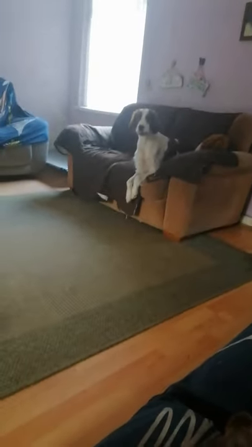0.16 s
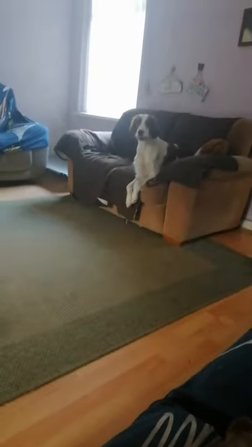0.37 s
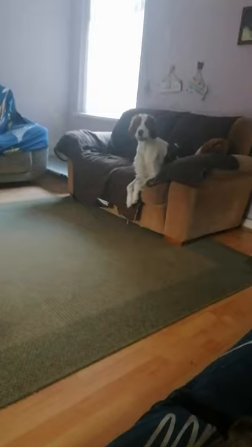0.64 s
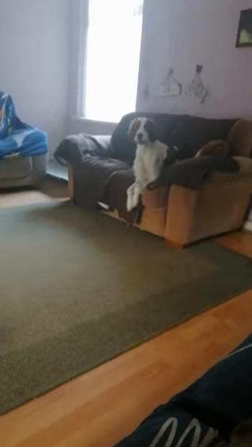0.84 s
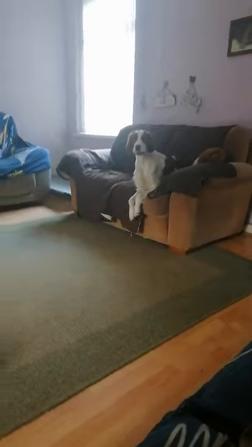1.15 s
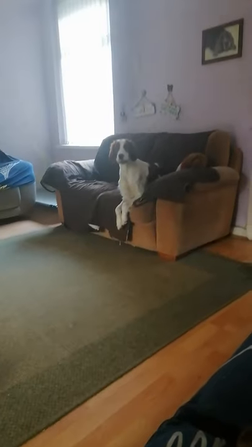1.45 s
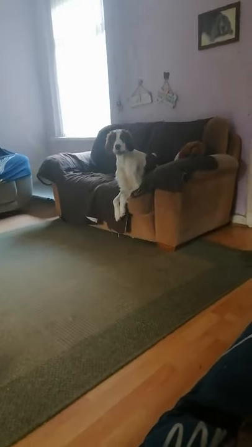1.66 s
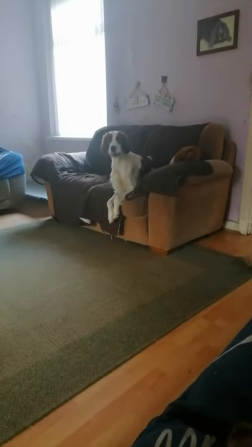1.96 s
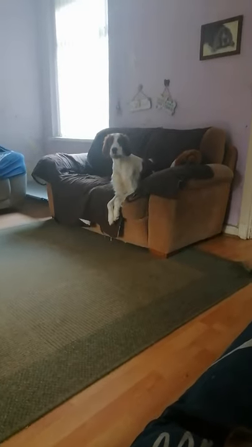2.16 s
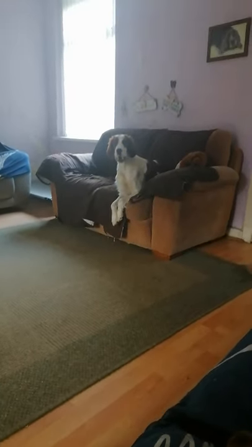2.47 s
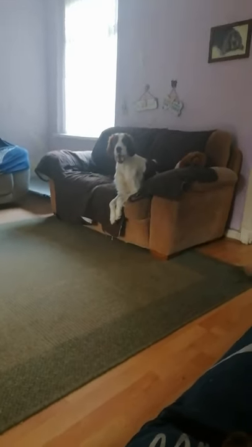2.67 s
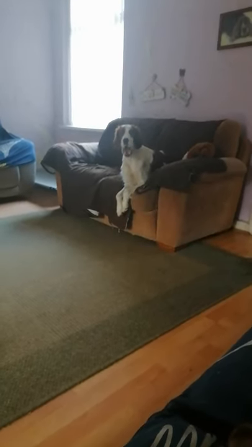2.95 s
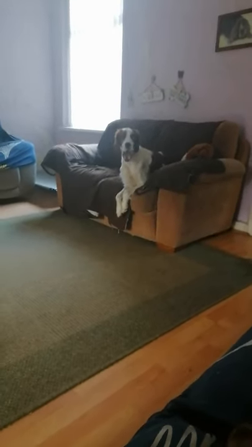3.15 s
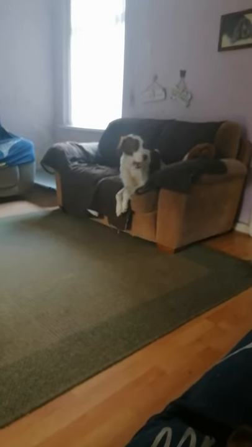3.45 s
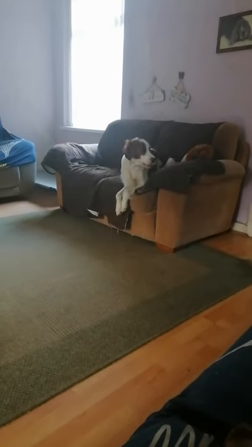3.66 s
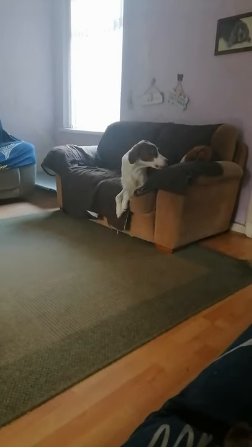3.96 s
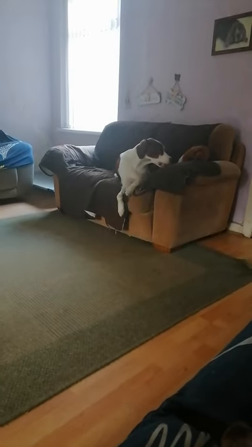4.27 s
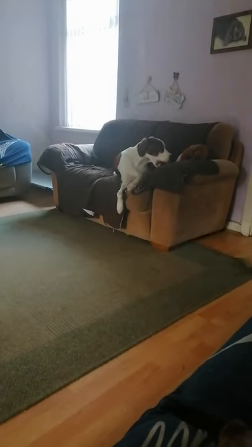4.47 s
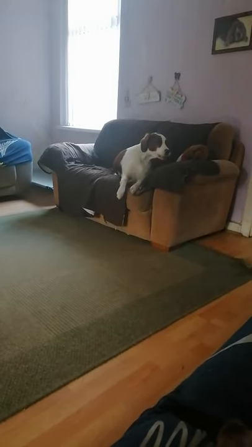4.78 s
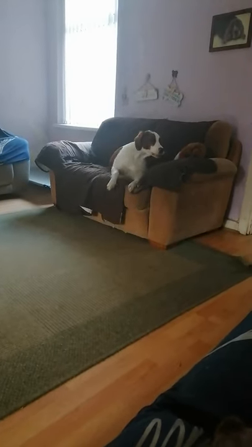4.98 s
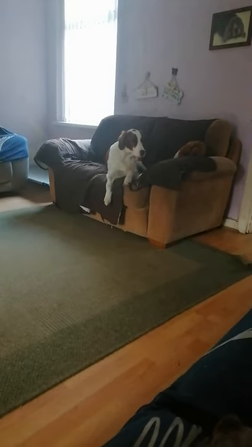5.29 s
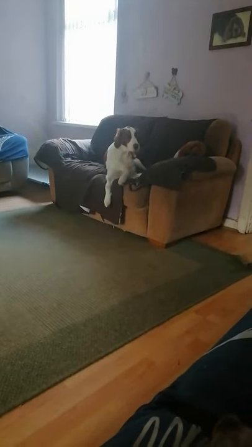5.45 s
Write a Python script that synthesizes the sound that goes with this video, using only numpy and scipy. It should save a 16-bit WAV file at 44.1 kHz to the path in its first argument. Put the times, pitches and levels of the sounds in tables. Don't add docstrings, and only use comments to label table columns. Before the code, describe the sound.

Quiet room tone with faint hum, then a dog's high, reedy nose whistles come in broken puffs, with a tiny chirp and a sharp whine among them. The whistles strengthen into a loud howl that drops in pitch and dies away. A near pause with a short huff follows, then a falling groan, a low growl and a last howl cut off at the end. The dog is some metres from a hand-held microphone indoors.

```python
import sys
import numpy as np
from scipy import signal
from scipy.fft import rfft, irfft, next_fast_len
from scipy.io import wavfile
from scipy.ndimage import uniform_filter1d

SR = 44100
rng = np.random.default_rng(int(sys.argv[2]) if len(sys.argv) > 2 else 0)


def magnitude_from_level(level_db):
    exponent = np.asarray(level_db, float) / 20
    return 10 ** exponent


def digitize_waveform(pressure):
    field = np.atleast_2d(pressure).T
    bounded = np.clip(field, -1, 1)
    quanta = np.round(bounded * 32767).astype(np.int16)
    wavfile.write(sys.argv[1], SR, quanta)


N = 247841

# (time [s], pitch [Hz], effort [dB], mouth opening as 2nd over 1st partial [dB])
CHIRP = [(1.03, 565, -65, -30), (1.052, 538, -48, -47), (1.128, 474, -63.5, -22), (1.15, 434, -58, -2)]
WHINE = [(1.79, 689, -65, -31), (1.827, 722, -30.5, -9.5), (1.855, 707.6, -28.5, -18),
         (1.965, 669.7, -31.5, -7.5), (2.127, 794.2, -28.5, -24), (2.161, 752, -26.5, -16),
         (2.18, 676.4, -28.5, -17.5), (2.205, 611, -34.5, -29), (2.227, 593, -24, -36)]
HIGH_HOWL = [(2.95, 665, -37, -29), (2.964, 662.3, -19.5, -9.5), (2.99, 645, -30, -28.5),
             (3.012, 636, -20, -15), (3.04, 636, -34, -6), (3.063, 634, -25.5, -11),
             (3.193, 621.5, -20.5, -7), (3.266, 618, -26.5, -11), (3.312, 624, -15, -6)]
LONG_HOWL = [(3.315, 483.6, -20.5, 17), (3.375, 475, -19, 20), (3.44, 472, -27, 14), (3.57, 447, -19, 11),
             (3.7, 413, -22, -4), (3.819, 406.4, -27, -9), (3.891, 379.9, -25, -15.5),
             (3.919, 393.3, -40, -8), (4.017, 378.8, -46, 19)]
HUFF = [(4.179, 237.3, -58.5, -0.5), (4.276, 478.2, -31.5, -5.5), (4.32, 471, -57.5, 8.5),
        (4.34, 516, -72.5, -9)]
GROAN = [(4.745, 582, -29.5, -20), (4.765, 564.5, -19.5, -38), (4.805, 426.7, -26.5, -6),
         (4.863, 353, -33.5, -3), (4.979, 276.1, -35, 10.5), (5.091, 266.3, -39, -3.5),
         (5.118, 261.4, -25, -2)]
GROWL = [(5.125, 218.5, -43, -2), (5.181, 213.3, -38.5, -0.5), (5.267, 211.4, -39, -10),
         (5.297, 212.5, -36.5, -8), (5.317, 230.4, -30, 2), (5.34, 233.6, -34, 5), (5.361, 236, -35, 8),
         (5.403, 217, -40, 6)]
LAST_HOWL = [(5.395, 316, -39, 15), (5.409, 292, -34.5, 29), (5.423, 292, -29.5, 18),
             (5.473, 290.2, -31.5, 4), (5.504, 298.6, -33, 13), (5.547, 267, -27.5, 21),
             (5.579, 268.7, -27.5, 7.1), (5.62, 286, -20.5, 33)]
GULP = [(3.937, 572, -79, -18), (3.955, 513, -49, -25), (3.992, 446, -58.5, -16)]
# (upper partials [dB], top partials [dB], mouth peak [Hz],
# half-pitch share [0-1], roughness [0-1])
MANNER = [
    (-14, -48, 1920, 0.26, 0.4),
    (5, -49, 3630, 0, 0.05),
    (-4.5, -48.5, 2000, 0.94, 0.11),
    (-6.5, -51, 1710, 0, 0.02),
    (-18, -61.5, 600, 0.36, 0.45),
    (-4.5, -47.5, 800, 0.38, 0.1),
    (-17, -53.5, 770, 0.33, .5),
    (3, -38, 1606, 0.01, 0.16),
    (-23, -55, 1500, 0.2, 0.8),
]
TILTS_DB = [-12, 27, -24.5, -2.5, 11.5, 2.5, 3.5, -1.5, -7]
GAPE = [(1.0, 1.4, 0.62), (.97, 1.06, 0.9), (1.1, 1.0, 1.0), (.95, 1.0, 1.0), (0.85, 1.3, 1.0),
        (1.05, 1.0, 0.92), (1.29, .95, 1.03), (1.22, 0.99, 1.03), (1.0, 1.0, 0.65)]
# (frequency [Hz], level [dB])
THROAT = [(800, 27.5), (2100, 2.5), (2700, 1.5), (3400, -8), (4000, -64)]
# (frequency [Hz], level [dB])
MOUTH = [(2600, -37), (4300, -8.5), (5200, 4), (5900, -5), (6500, -7), (7200, -2.5), (7800, -14.5),
         (8800, 2.5), (9800, -3.5), (10500, -12), (11700, -6), (13000, -9), (14000, -14), (15500, -22)]
# (time [s], pitch [Hz], level [dB], pinch as overtones over 1st partial [dB])
WHISTLE_A = [(.3, 2955, -56.5, -54), (.342, 3140, -72, 3), (.352, 3094, -43, 20), (.385, 3103, -41.5, -46),
             (.41, 3243, -40, -17), (.458, 3344, -36.5, -14), (.5, 3440, -52, -15), (.6, 3217, -37.5, -14)]
WHISTLE_B = [(0.449, 3007, -50, -12), (0.559, 3050, -54.5, -4), (0.606, 3010, -33, -28),
             (0.681, 2550, -50.5, -4), (0.788, 2324, -45.5, 5), (0.949, 2220, -48, 6.5),
             (1.012, 2490, -38.5, -11), (1.082, 2595, -52.5, 12.5), (1.14, 2578, -47, -24)]
WHISTLE_C = [(1.4, 3295, -59, -5), (1.431, 3076, -59, -30), (1.493, 3255, -50, 58), (1.57, 3370, -57.5, 66)]
WHISTLE_D = [(1.572, 2750, -61, 41), (1.679, 2800, -47.5, 4.7), (1.741, 3074, -40, 12),
             (1.823, 3097, -45, 38), (1.839, 3030, -77, 12), (1.896, 2884, -46, 19), (2.032, 3050, -79, 11),
             (2.094, 2953, -34.5, 33), (2.24, 3050, -53, 23)]
WHISTLE_E = [(2.468, 3140, -62, 12), (2.494, 3320, -43, 2.9), (2.514, 2850, -61.5, 8.9),
             (2.562, 3188, -33.5, 28), (2.622, 3175, -28.5, 51), (2.677, 3106, -32, 23),
             (2.73, 3076, -46, 25)]
WHISTLE_F = [(2.67, 3210, -42.5, 33), (2.72, 2820, -57, -11), (2.781, 2581, -48.5, -4),
             (2.976, 2685, -41, 18), (3.068, 2627, -36, -1.5), (3.13, 2740, -34.5, -8),
             (3.192, 2580, -35, -4.5), (3.25, 2887, -39, 1.5), (3.33, 2840, -36.5, -6)]
WHISTLE_G = [(4.37, 1530, -61, 13), (4.4, 1503, -68, 17), (4.46, 1481, -65.5, -19),
             (4.54, 1423, -61.5, -14)]
WHISTLE_H = [(4.549, 1917, -62, -15), (4.591, 2092, -46, -21.5), (4.63, 2120, -55, -8.5),
             (4.662, 2020, -35, -23.5), (4.69, 2015, -37.5, -20.5), (4.735, 1999, -33.5, -22),
             (4.748, 2007, -34.5, -20), (4.761, 2076, -38, -12)]
WHISTLE_I = [(4.769, 2708, -49.5, -17), (4.846, 2652, -48, -10), (4.916, 2650, -67.5, -9),
             (5.0, 2577, -59, 6)]
WHISTLE_J = [(1.57, 2575, -67, 14), (1.68, 2610, -55, 7.3), (1.79, 2670, -90, 8.1)]
WHISTLE_K = [(2.19, 2734, -45, -25), (2.21, 2633, -48, -25), (2.299, 2616, -73, -30)]
WHISTLE_L = [(4.179, 2865, -69, 25), (4.211, 3140, -50.5, 25.05), (4.249, 3006, -70, 25),
             (4.4, 2880, -75, 25)]
# (2nd [dB], 3rd [dB], 4th [dB])
OVERTONES = [(-13, -3, -19), (-4.5, -21.5, -27), (-46, -9, -40), (-9, 4, 1.5), (-49, -4, -62),
             (-2, -29, -4), (-35, -26, 0), (10.5, -7.5, 1), (8, -21, -50), (1, -36, -32), (-11, -7, -21),
             (-24, -12, -34)]
FIFTH_DB = [-31, -31, -58, -33.5, -59, -27.5, -40, 5, -46, -42, -30, -39]
# (time [s], length [s], hiss [dB], rasp [dB])
BREATH = [(0.44, 0.18, -63.5, -58), (0.582, 0.19, -57.5, -48), (0.989, 0.051, -46.5, -51),
          (1.544, 0.16, -58, -55.5), (1.842, 0.37, -57, -87), (2.182, 0.029, -62, -37.5),
          (2.507, 0.072, -81.5, -47.5), (2.696, 0.45, -48, -39), (2.949, 0.3, -73.5, -28),
          (3.357, 0.33, -100, -29), (3.944, 0.0085, -77, -60.5), (4.211, 0.016, -72, -50),
          (4.331, 0.22, -73.5, -56.5), (4.606, 0.12, -64.5, -95), (4.682, .06, -83, -38.5),
          (5.171, 0.078, -64.5, -72), (5.5, 0.095, -79, -39.5)]
# (frequency [Hz], density [dB per Hz])
HISS = [(1940, -17.5), (3300, -3.5), (4300, 16), (4960, -29.5), (7070, -31.5), (8530, 4), (10100, 1.5),
        (10800, 0.5), (13200, 1.5), (15000, -37.5), (15500, -55.5)]
# (frequency [Hz], t60 [s])
ROOM = [(250, 0.45), (700, 0.39), (2000, 0.36), (5000, 0.26), (10000, 0.11)]
# (frequency [Hz], density [dB per Hz])
QUIET = [(12, -38.5), (20, 2), (106, -9.5), (140, -6.5), (259, -10.5), (297, -15.5), (439, -10.5),
         (477, -13.5), (1010, -18.5), (2140, -27.5), (3540, -34.5), (9910, -54), (15500, -57)]
# (start [s], end [s], frequency [Hz], level [dB])
HUM = [
    (0, 4.2, 136.8, -69.5),
    (.4, 1.7, 301.7, -73),
]

UPPER_PER_OPENING, UPPER_DB_PER_OCTAVE = 0.62, -22
TOP_PER_EFFORT, TOP_DB_PER_OCTAVE = 0.51, 9
TOP_PATCHY_DB, TOP_RISE_S = 4.0, 0.036
HALF_AT_START, HALF_FROM, HALF_FULL = 0.11, 0.24, 0.41
NOSE_HZ, NOSE_WIDTH_HZ, NOSE_DB = 9110, 270, 14
PUFF_RISE_DB_PER_S, PUFF_FALL_DB_PER_S = 298, 171.5
PORT_LAG = 6


def folds():
    low, top, throb = np.zeros(N), np.zeros(next_fast_len(N)), np.zeros(N)
    calls = (CHIRP, WHINE, HIGH_HOWL, LONG_HOWL, HUFF, GROAN, GROWL, LAST_HOWL, GULP)
    for call, manner, tilt_db, (glide, *scales) in zip(calls, MANNER, TILTS_DB, GAPE):
        upper_db, top_db, mouth_hz, half, rough = manner
        start, (hz, effort_db, open_db), gate = played(call, fade_s=0.0057)
        n = len(hz)
        here = slice(start, start + n)

        octaves = np.log2(hz / 400)
        upper_db = upper_db + UPPER_PER_OPENING * open_db + UPPER_DB_PER_OCTAVE * octaves
        first_db, second_db, upper_db = shared(effort_db, np.zeros(n), open_db, upper_db)
        top_db = top_db + TOP_PER_EFFORT * (effort_db + 27.0) + TOP_DB_PER_OCTAVE * octaves

        rough = np.clip(rough, 0, 1)
        onset = np.interp(np.linspace(0, 1, n), [HALF_FROM, HALF_FULL], [HALF_AT_START, 1])
        half = np.clip(half * onset, 0, 1)
        jitter = 0.063 * steep_noise(28.2, n) + 0.204 * rough * steep_noise(148, n)
        phase = 2 * np.pi * np.cumsum(hz * (1 + rough * jitter)) / SR
        uneven = half * np.cos(phase / 2)
        size = np.sqrt(2) * gate * magnitude_from_level(8.04 * rough * steep_noise(102, n))

        voice = magnitude_from_level(first_db - 2.0) * np.cos(phase) * (1 + rough ** 2 * uneven)
        half_lines = 0.86 * half * np.cos(3 * phase / 2) + 0.3 * half * np.cos(5 * phase / 2)
        voice += magnitude_from_level(second_db) * (np.cos(2 * phase) + half_lines)
        moving_hz = mouth_hz * np.linspace(1, glide, n)
        voice += magnitude_from_level(upper_db) * stack(hz, phase, tilt_db, moving_hz) * (1 + uneven)
        low[here] += size * voice

        scatter = 1 + uneven + 8.1 * rough ** 2 * steep_noise(260, n)
        slap = snaps(hz, phase, np.linspace(*scales, n))
        top[here] += np.sqrt(size * gate) * magnitude_from_level(top_db - 5.0) * slap * scatter
        throb[here] += gate * np.cos(phase)
    treble = shaped([(3000, -22.5), (4300, -10.5), (4800, 0.5), (15000, 0)], top)[:N]
    return low + treble, throb


def stack(hz, phase, tilt_db, mouth_hz):
    k = np.arange(3, 20)[:, None]
    mouth_db = 16 * np.exp(-((k * hz - mouth_hz) / 330) ** 2)
    level_db = at_hz(THROAT, k * hz) + tilt_db * np.log2(k) + mouth_db
    gains = (k * hz < THROAT[-1][0]) * magnitude_from_level(level_db)
    partials = gains * np.cos(k * phase + k * k)
    return np.sum(partials, axis=0) / np.sqrt(np.sum(gains ** 2, axis=0) + 1e-20)


def snaps(hz, phase, scale):
    k = np.arange(5, 56)[:, None]
    step = 32
    partial_hz = k * hz[::step]
    chance = uniform_filter1d(rng.standard_normal(partial_hz.shape), size=90, axis=1)
    patches_db = TOP_PATCHY_DB * rms_one(uniform_filter1d(chance, size=3, axis=0))
    tightness = (partial_hz / 8000) ** (0.76 * np.log2(hz[::step] / 440))
    mouth = magnitude_from_level(at_hz(MOUTH, partial_hz / scale[::step]) + patches_db)
    gains = (partial_hz < 15600) * tightness * mouth
    gains = np.repeat(gains, step, axis=1)[:, :len(hz)]
    rise = np.clip(np.arange(len(hz)) / (TOP_RISE_S * SR), 0, 1)
    return np.sum(gains * np.cos(k * phase + k * k), axis=0) * np.sqrt(hz / 5000) * rise


def whistle(throb):
    out = np.zeros(N)
    puffs = (WHISTLE_A, WHISTLE_B, WHISTLE_C, WHISTLE_D, WHISTLE_E, WHISTLE_F,
             WHISTLE_G, WHISTLE_H, WHISTLE_I, WHISTLE_J, WHISTLE_K, WHISTLE_L)
    for puff, overtones_db, fifth_db in zip(puffs, OVERTONES, FIFTH_DB):
        start, (hz, blow_db, pinch_db), gate = played(puff, fade_s=0.0015)
        n = len(hz)
        here = slice(start, start + n)
        nose_db = [NOSE_DB * np.exp(-((k * hz - NOSE_HZ) / NOSE_WIDTH_HZ) ** 2) for k in (2, 3, 4)]
        parts_db = [pinch_db + db + lift for db, lift in zip(overtones_db, nose_db)]
        partials_db = shared(blow_db, np.zeros(n), *parts_db)
        phase = 2 * np.pi * np.cumsum(hz * (1 + 0.0015 * drift(35, n))) / SR
        for k, level_db in enumerate(partials_db, 1):
            airy = magnitude_from_level(1.5 * steep_noise(45, n)) + 0.085 * k * steep_noise(130 * k + 60, n)
            out[here] += np.sqrt(2) * gate * magnitude_from_level(level_db) * airy * np.cos(k * phase)
        fifth_level_db = level_db - overtones_db[-1] + fifth_db
        out[here] += gate * magnitude_from_level(fifth_level_db) * airy * np.cos(5 * phase)
    return out * (1 + 0.53 * throb)


def breath(throb):
    s, length, hiss_db, rasp_db = np.transpose(BREATH)[..., None]
    t = np.arange(0, N + 64, 64) / SR
    rise_db = -PUFF_RISE_DB_PER_S * np.maximum(s - t, 0)
    fall_db = -PUFF_FALL_DB_PER_S * np.maximum(t - s - length, 0)

    def gain(level_db):
        return np.interp(np.arange(N) / SR, t, np.sum(magnitude_from_level(rise_db + fall_db + level_db), axis=0))

    hiss = patchy(coloured(HISS, size=(N,)), patchy_db=4.0)
    rasp = coloured([(420, -52.5), (660, 8.5), (1000, -6.5), (1450, 10.5), (2000, -7.5),
                     (2700, 8.5), (3400, -16.5), (3900, -3.0)], size=(N,))
    air = magnitude_from_level(5.0) * gain(hiss_db) * hiss + magnitude_from_level(-18.5) * gain(rasp_db) * rasp
    return air * (1 + 0.2 * throb)


def throat_pocket(air):
    notch = signal.butter(3, [3640, 4550], "bandstop", fs=SR, output="sos")
    return 0.12 * air + signal.sosfilt(notch, air)


def room(x, direct_db, tail_db):
    t = np.arange(SR) / SR
    edges = [90, 450, 1200, 3200, 7500, 17000]
    tail = 0
    for (hz, t60), low, high in zip(ROOM, edges, edges[1:]):
        band_pass = signal.butter(2, [low, high], "band", fs=SR, output="sos")
        band = signal.sosfilt(band_pass, rng.standard_normal((2, SR)))
        decay = magnitude_from_level(-60 * t / t60) + magnitude_from_level(-14.0 - 25 * t / t60)
        tail = tail + band * decay / np.sqrt(t60 * SR / np.log(1e6))
    high_pass = signal.butter(4, 240, "high", fs=SR, output="sos")
    unlike = signal.sosfilt(high_pass, tail[0] - tail[1]) / 2
    tail = np.mean(tail, axis=0) + unlike * [[1], [-1]]
    build_up = np.clip((t - 0.003) / 0.0033, 0, 1)
    reply = magnitude_from_level(tail_db) * tail * build_up
    reply[[0, 1], [0, PORT_LAG]] += magnitude_from_level(direct_db)
    return signal.fftconvolve(x[None], reply, axes=1)[:, :N]


def room_floor(dog):
    own, common = coloured(QUIET, size=(2, N)), coloured(QUIET, size=(N,))
    split_hz = 220
    air = signal.sosfilt(signal.butter(2, split_hz, "high", fs=SR, output="sos"), own) + 1.37 * own
    air += signal.sosfilt(signal.butter(2, split_hz, fs=SR, output="sos"), common)
    settling = np.exp(-np.arange(N) / (0.3 * SR))
    air += 2.0 * settling * signal.sosfilt(signal.butter(2, 150, fs=SR, output="sos"), common)
    air *= magnitude_from_level(-72.5 + 0.53 * drift(4, N))
    for start, end, hz, level_db in HUM:
        running = np.interp(np.arange(N) / SR, [start - 0.1, start, end, end + 0.027], [0, 1, 1, 0])
        hum = coloured([(hz * 0.9, -40), (hz, 0), (hz * 1.1, -40)], size=(N,))
        air += running * magnitude_from_level(level_db) * hum
    power = signal.lfilter([1 / 3000], [1, 1 / 3000 - 1], dog[0] ** 2)
    loud_db = 10 * np.log10(power + 1e-12)
    return air * magnitude_from_level(-0.5 * np.maximum(loud_db + 30, 0))


def played(rows, fade_s):
    s, *columns = np.transpose(rows)
    start = round(s[0] * SR)
    t = np.arange(start, min(round(s[-1] * SR), N)) / SR
    cut_off = s[-1] * SR > N - 9
    gate = np.clip(np.minimum(t - s[0], s[-1] - t + cut_off) / fade_s, 0, 1)
    return start, [np.interp(t, s, c) for c in columns], gate


def shared(total_db, *parts_db):
    return total_db + parts_db - 10 * np.log10(sum(magnitude_from_level(part) ** 2 for part in parts_db))


def rms_one(x):
    return x / np.sqrt(np.mean(x ** 2) + 1e-20)


def at_hz(points, hz):
    point_hz, level_db = np.transpose(points)
    return np.interp(np.log(np.maximum(hz, 1)), np.log(point_hz), level_db)


def shaped(points, x):
    n = x.shape[-1]
    return irfft(rfft(x) * magnitude_from_level(at_hz(points, np.fft.rfftfreq(n, 1 / SR))), n)


def coloured(points, size):
    white = rng.standard_normal((*size[:-1], next_fast_len(size[-1])))
    return rms_one(shaped(points, white))[..., :size[-1]]


def drift(rate, size):
    r = np.exp(-2 * np.pi * rate / SR)
    return rms_one(signal.lfilter([1], [1, -2 * r, r * r], rng.standard_normal(size + 4000))[4000:])


def steep_noise(hz, size):
    low_pass = signal.butter(4, hz, fs=SR, output="sos")
    return rms_one(signal.sosfilt(low_pass, rng.standard_normal(size + 2000))[2000:])


def patchy(x, patchy_db):
    edges = np.geomspace(1000, 16000, 26)
    out = np.zeros(N)
    for edge in zip(edges, edges[1:]):
        band = signal.sosfilt(signal.butter(2, edge, "band", fs=SR, output="sos"), x)
        out += band * magnitude_from_level(patchy_db * drift(9.2, N))
    return rms_one(out)


def scene():
    voice, throb = folds()
    air = throat_pocket(voice + breath(throb))
    dog = room(air + whistle(throb), direct_db=-1.5, tail_db=1.0)
    return dog + room_floor(dog)


def top_cut(x):
    return signal.sosfilt(signal.butter(12, 15610, fs=SR, output="sos"), x)


def record(dry):
    return top_cut(dry)


dry = scene()
out = record(dry)
digitize_waveform(out)
```